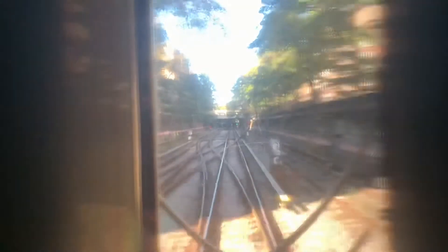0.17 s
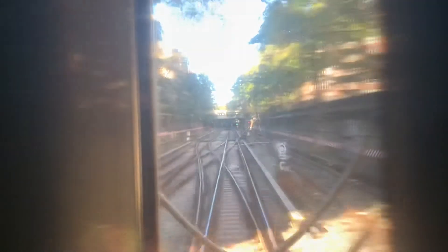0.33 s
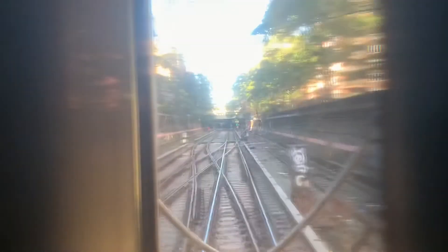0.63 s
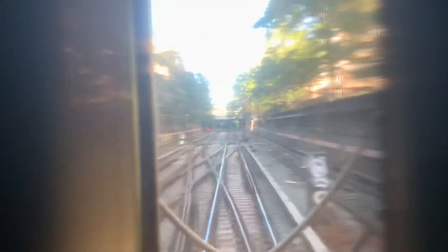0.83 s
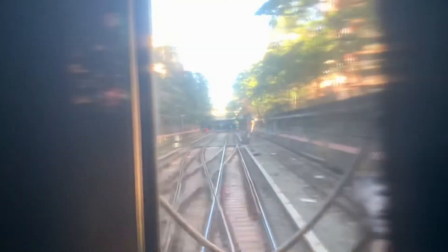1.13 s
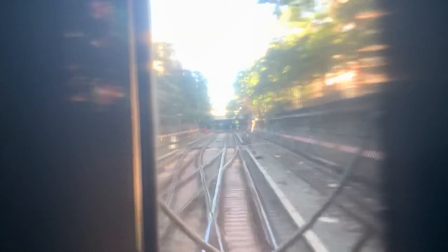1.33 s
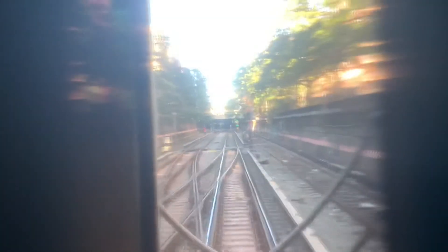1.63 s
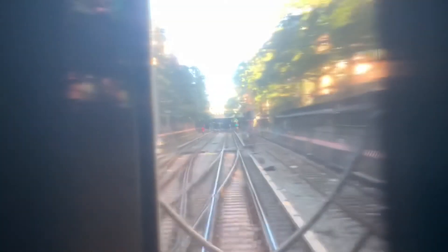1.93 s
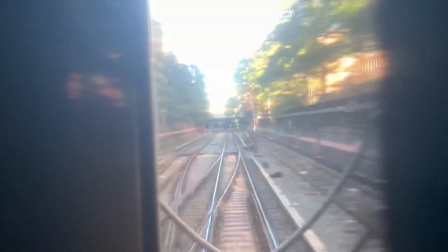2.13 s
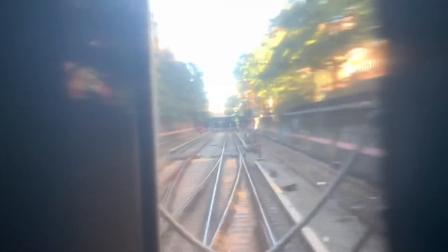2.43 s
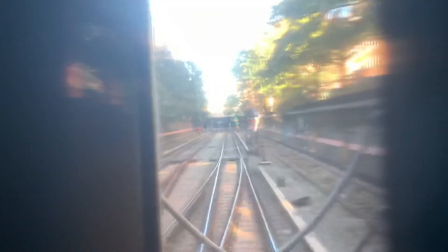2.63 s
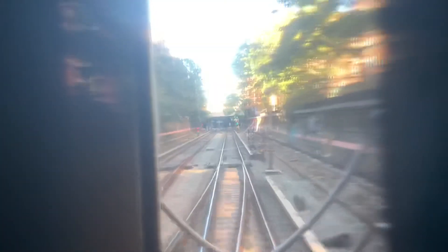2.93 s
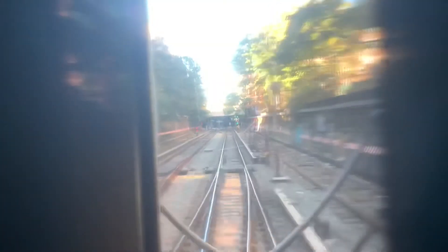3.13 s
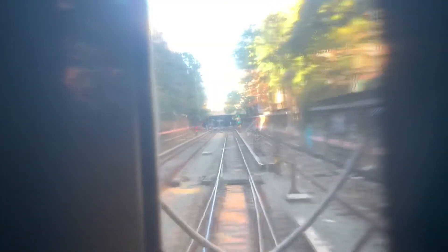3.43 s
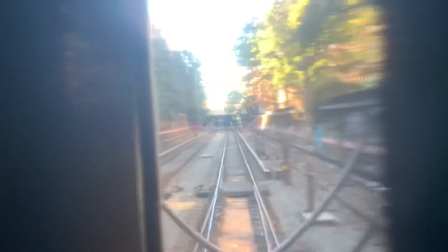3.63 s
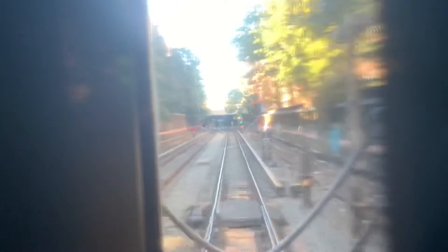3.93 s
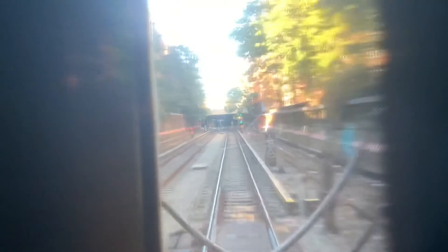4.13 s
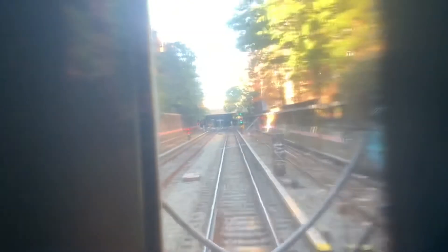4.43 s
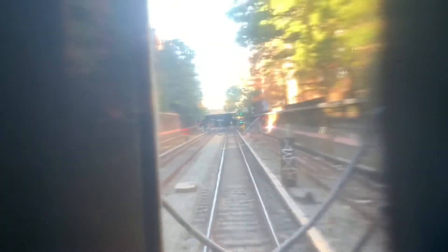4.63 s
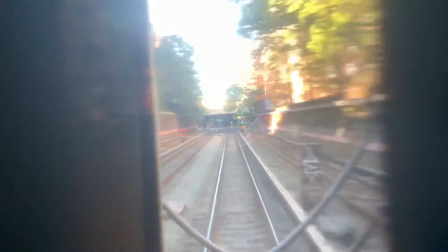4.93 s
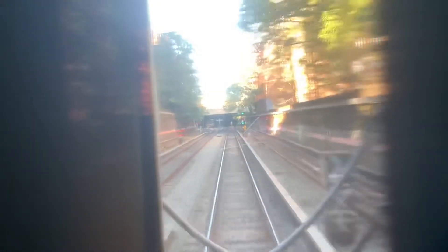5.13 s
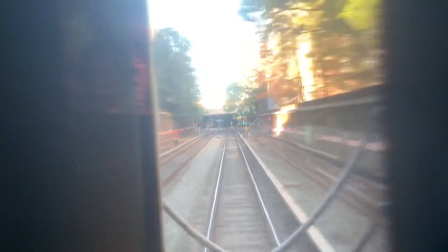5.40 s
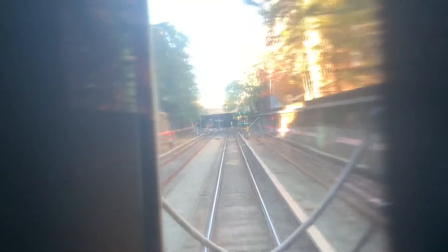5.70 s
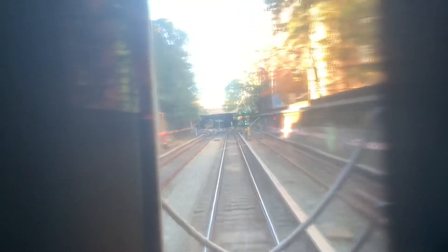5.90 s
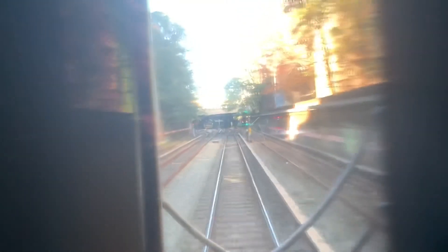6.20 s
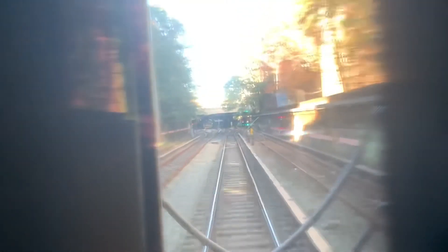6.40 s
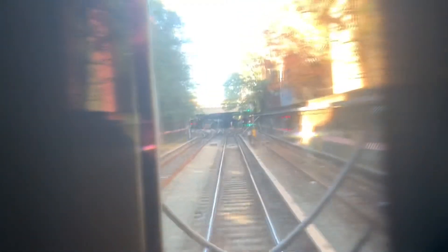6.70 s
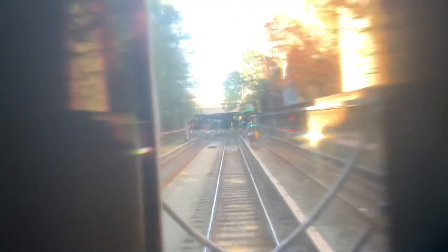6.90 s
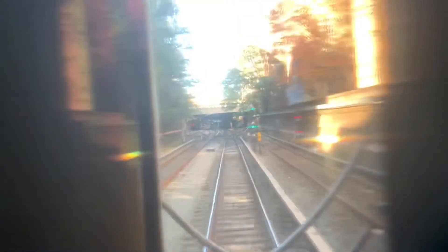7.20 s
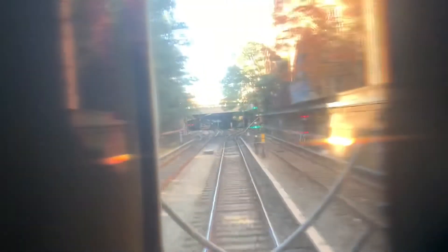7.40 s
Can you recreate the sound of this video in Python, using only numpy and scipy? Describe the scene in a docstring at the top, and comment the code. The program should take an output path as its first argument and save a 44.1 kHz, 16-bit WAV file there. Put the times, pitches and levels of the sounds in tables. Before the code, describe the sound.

From inside the cab of a moving metro train, the wheels make a continuous low rumble and the car body booms over bumps. In the first seconds the wheels clank sharply across rail gaps, with short gritty scrapes between. A heavier drumming follows through the switches, with a couple of small close ticks. Later the rumble evens out, with a soft thud and faint squeaks. A thin electric whine wavers throughout.

```python
"""Metro front cab at speed, through an open cutting and over switches.

Rough wheels and rails shake the car body; its panels and air space boom. The power converter
whines throughout. Wheels clank over rail gaps, a loose fitting ticks close by, flanges rub
and squeak, and the switchwork drums under the bogie."""
import sys
import numpy as np
from scipy import signal
from scipy.fft import rfft, irfft, next_fast_len
from scipy.io import wavfile
from scipy.ndimage import uniform_filter1d, minimum_filter1d

SR = 44100
rng = np.random.default_rng(int(sys.argv[2]) if len(sys.argv) > 2 else 0)


def put_to_file(sound):
    """Save the sound as 16-bit audio at rate SR, in the file named by the first command-line argument."""
    columns = np.atleast_2d(sound).T  # one column per channel
    safe = np.clip(columns, -1, 1)
    whole_steps = np.round(safe * 32767)
    wavfile.write(sys.argv[1], SR, whole_steps.astype(np.int16))


N = 332955
TIME_S = np.arange(N) / SR
FFT_SIZE = next_fast_len(N, real=True)
FREQ_HZ = np.maximum(np.arange(FFT_SIZE // 2 + 1) * SR / FFT_SIZE, 1)

# Rolling noise through the car body. Each row: frequency in Hz, relative density in dB.
BODY_SPECTRUM = [(20, -39.5), (31, -18.5), (43, -1), (75, 3.5), (130, 0), (310, -4), (480, -13), (720, -21),
                 (1400, -29.5), (2050, -29.5), (3000, -46), (6500, -62), (9000, -86), (15000, -95.5)]
# Its stereo width. Each row: frequency in Hz, side minus mid in dB.
BODY_SPREAD = [(40, -8.5), (120, -11.5), (200, -7.5), (330, -3.5), (500, 0), (740, 2.5), (1000, 1),
               (2000, -0.16)]
# Cab and wheel resonances. Each row: frequency in Hz, width in Hz, mid lift in dB, side lift in dB.
CAB_MODES = [(84.1, 6, 6, -5), (116, 57, -0.5, -3.5), (182.1, 41, 7.5, -2), (295.4, 37, 4, -4),
             (356.8, 30, 5.5, -2), (410, 52, 1.5, 2), (482, 36, 3.5, 1.5), (591, 44, 2.5, 2.5),
             (934, 130, 3, 0), (1420, 120, 1, 6.5), (1903, 190, 5, 2.5)]
# Track roughness, worst at the switches. Each row: time in seconds, relative level in dB.
TRACK_ROUGHNESS = [(0, -14.5), (0.25, -19.5), (0.5, -15.5), (0.85, -18), (1.72, -15.5), (1.95, -17),
                   (2.15, -12.5), (2.8, -16.5), (4.7, -16.5), (5.5, -17.5), (6.5, -16.5), (7.55, -17)]
# Slow body sway. Each row: time in seconds, level in dB.
SWAY_LEVEL = [(0, -25.5), (1.3, -28.5), (2.3, -27), (4.35, -33), (5.7, -26), (7.55, -28.5)]
# Bands above the sway: bogie boom, floor drone, wall panels, rail roar, wheel ring, tread hiss.
# Each row: level on average track in dB, dB per dB of roughness, flutter in dB, left minus right in dB.
ROLLING_BANDS = [(-22.5, 0.2, 0.5, 2), (-19.5, 0.26, 0, 0.5), (-18, 1.0, 0.5, 2.5), (-27, 0.93, 1.0, 1.15),
                 (-36, 0.8, 1.0, 1), (-50, 1, 1.5, 1.3)]
# Track dips and humps. Each row: start and length in seconds, bogie, floor and wall levels in dB.
JOLTS = [(0.045, 0.047, -19, -24, -16), (0.17, 0.24, -16.5, -29, -35), (0.598, 0.091, -15.5, -36, -15.5),
         (1.668, 0.25, -19.5, -36, -20.5), (2.087, 0.15, -17, -13, -28), (2.254, 0.15, -16.5, -15.5, -25),
         (2.713, 0.11, -32, -15, -25), (2.902, 0.19, -18, -12.5, -15.5), (3.121, 0.25, -19.5, -21.5, -21.5),
         (3.415, 0.12, -26, -18.5, -16), (3.638, 0.14, -20.5, -23, -18.5), (4.122, 0.069, -33, -12.5, -32),
         (4.278, 0.18, -18, -20, -38), (4.643, 0.074, -17.5, -25, -26), (6.02, 0.088, -19, -26, -22.5),
         (6.63, 0.058, -32, -14.5, -22.5), (6.99, .07, -18, -34, -41)]
# Converter switching tone. Each row: time in seconds, relative level in dB.
WHINE_LEVEL = [(0.0, -61), (0.3, -50), (0.5, -64), (0.65, -54), (1.35, -61), (1.75, -51.5), (2.76, -52.5),
               (2.85, -75), (2.95, -51.5), (3.1, -60), (4.3, -53.5), (4.6, -64), (4.75, -60), (5.25, -52.5),
               (5.75, -57.5), (6.0, -70), (6.7, -62), (7.54, -60)]
# Its standing waves at the ears. Each row: time in seconds, left phase lead in radians.
WHINE_PHASE = [(0.75, -1), (1.2, 1), (2.8, 0.78), (2.9, -1.1), (6.1, -1.1), (6.6, 0.1)]
# Its sideband balance. Each row: time in seconds, lower minus upper in dB.
SIDEBAND_BALANCE = [(2.3, 10), (3.2, -7.5), (6.2, -3), (6.8, 9)]
# A thin high tone and a narrow hiss. Each row: frequency in Hz, width in Hz, level in dB.
FAINT_HIGHS = [(8540, 12, -89.5), (11000, 610, -80.5)]
# Wheels striking rail gaps. Each row: start in seconds, clank level in dB, rise and contact times
# in seconds, thud level in dB.
RAIL_JOINTS = [(0.272, -33.5, 0.011, .011, -38), (0.648, -18.5, .002, 0.0033, -10),
               (0.653, -15.5, 0.0024, 0.0053, -11), (0.669, -24, .002, 0.0026, -10),
               (1.383, -26, .004, .006, -25), (1.392, -22, .005, 0.019, -20),
               (2.207, -22.5, .005, 0.0058, -31), (2.227, -18, 0.011, 0.0049, -18),
               (2.555, -34, 0.031, 0.021, -35), (4.180, -40, 0.0095, .011, -21),
               (6.449, -43.5, 0.0037, 0.0088, -17.5), (7.199, -33.5, .002, 0.006, -34)]
# Steel clank. Each row: frequency in Hz, relative density in dB.
CLANK_SPECTRUM = [(400, -3), (900, 5.5), (1400, 3), (2100, 5), (2900, -6), (4500, -8), (6800, -15.5),
                  (8200, -27.5), (10000, -44), (15000, -54)]
# Wheel resonances. Each row: frequency in Hz, width in Hz, lift in dB.
WHEEL_MODES = [(1624, 76, 3.5), (1856, 170, 6.5), (2090, 99, 4), (2310, 130, 7), (3380, 100, 6.5),
               (3530, 110, 5), (3930, 87, 4.5), (4580, 220, 3.5)]
# Taps of the loose fitting. Each row: start in seconds, gain in dB, tilt in dB per octave,
# left minus right in dB, left ear lag in milliseconds.
TICKS = [(0.671, -34, 4, -2, 0.22), (2.3195, -27, 1, -2, 0.2), (3.0864, -23, 3, -1, 0.294),
         (7.113, -36, -2, 0, -0.083)]
# Resonances of the fitting. Each row: frequency in Hz, relative level in dB, T60 in seconds.
FITTING_MODES = [(2520, 12.5, 0.0051), (3430, 10, 0.0042), (4630, 2, 0.0066), (6400, 3.5, 0.0073),
                 (9600, -5, 0.0035), (11300, -2, 0.0055)]
# Flanges on the rail head. Each row: middle and length in seconds, centre and width in Hz, level in dB.
FLANGE_RUBS = [(0.99, 0.025, 2240, 1000, -32), (1.068, 0.057, 1810, 230, -28.5),
               (1.065, 0.071, 2380, 380, -35.5), (1.195, 0.12, 2140, 520, -34),
               (1.11, 0.25, 3600, 2300, -47.5), (1.68, 0.23, 2300, 2200, -41.5),
               (1.715, 0.061, 1400, 600, -32), (2.35, 0.11, 1150, 1800, -27.5),
               (3.024, 0.25, 1870, 1300, -28.5), (3.01, 0.21, 3550, 1500, -41.5),
               (5.085, 0.032, 1050, 370, -28), (6.075, 0.13, 4750, 1100, -54),
               (6.11, 0.16, 840, 440, -29.5), (6.44, 0.18, 630, 740, -27)]
# Notes of a slipping wheel. Each row: middle and length in seconds, pitch in Hz, level in dB.
SQUEAKS = [(1.138, .055, 4360, -53), (1.125, .03, 3110, -50), (6.41, .03, 4188, -50),
           (6.412, .04, 3930, -53), (6.59, .085, 4350, -48.5), (6.6, .09, 4100, -59)]
# Drone over the switches. Each row: time in seconds, level in dB.
SWITCH_LEVEL = [(2.03, -36), (2.12, -19), (2.25, -13), (2.6, -24), (2.9, -25), (3.25, -19.5), (4.25, -22.5),
                (4.8, -42)]


def undb(db):
    """Decibels to gain."""
    return np.exp(np.asarray(db) * (np.log(10) / 20))


def curve(points):
    """Breakpoints joined linearly in time."""
    return np.interp(TIME_S, *np.transpose(points))


def spectrum_db(points):
    """Breakpoints joined on a log frequency axis."""
    hz, db = np.transpose(points)
    return np.interp(np.log(FREQ_HZ), np.log(hz), db)


def bell(hz, width_hz):
    """Gaussian peak of height 1; width at half height."""
    near = np.abs(FREQ_HZ - hz) < 3 * width_hz
    return near * np.exp2(-(2 * (FREQ_HZ - hz) / width_hz) ** 2)


def lowpass(hz, order=2):
    """Butterworth gain per frequency."""
    return 1 / np.sqrt(1 + (FREQ_HZ / hz) ** (2 * order))


def minimum_phase(db):
    """Response with this spectrum that rings only after a strike."""
    cepstrum = irfft(np.log(undb(db)), FFT_SIZE)
    fold = np.where(np.arange(FFT_SIZE) < FFT_SIZE // 2, 2, 0)
    return np.exp(rfft(cepstrum * fold) - cepstrum[..., :1])


def filtered(x, gain):
    """Apply a gain per frequency."""
    return irfft(rfft(x, FFT_SIZE) * gain, FFT_SIZE)[..., :N]


def unit_rms(x):
    """Scale to rms 1."""
    return x / np.sqrt(np.mean(x ** 2))


def steady(x, span_s):
    """Hold the running rms across channels at 1."""
    size = int(span_s * SR / 2) + 1
    power = np.mean(x ** 2, axis=0)
    return x / np.sqrt(uniform_filter1d(uniform_filter1d(power, size), size))


def noise_pair(gain):
    """Two independent filtered noises, joint rms 1."""
    return unit_rms(filtered(rng.standard_normal((2, N)), gain))


def flutter(cutoff_hz):
    """Low-passed random waver, rms 1."""
    return unit_rms(filtered(rng.standard_normal(N), lowpass(cutoff_hz)))


def impacts(median_hz, t60_s, scatter_db=1.0):
    """Envelope of a run of small, uneven impacts, rms 1."""
    gap, size = rng.standard_normal((2 * median_hz * N // SR, 2)).T
    starts_s = np.cumsum(np.exp(gap / 2)) / median_hz - 1
    last = np.searchsorted(starts_s, TIME_S) - 1
    jagged = undb(scatter_db * size[last] - 60 * (TIME_S - starts_s[last]) / t60_s)
    return unit_rms(filtered(jagged, lowpass(4 * median_hz) ** 2))


def panel_ripple_db(spacing_hz=29.99, depth_db=6.0):
    """Crowded small panel modes above the boom: a static spectral ripple per ear."""
    grid_hz = np.arange(0, SR / 2, spacing_hz)
    heights = rng.standard_normal((len(grid_hz), 2)).T
    ripple = np.array([np.interp(FREQ_HZ, grid_hz, ear) for ear in heights])
    return depth_db * (1 - lowpass(650)) * ripple


def cab_bands(ripple_db, crossovers_hz=(58, 115, 235, 520, 1600, 2800)):
    """Noise through the cab's resonances, in seven levelled and panned bands, sway first."""
    body_db = spectrum_db(BODY_SPECTRUM)
    mid_db = body_db + sum(lift * bell(hz, width) for hz, width, lift, _ in CAB_MODES)
    side_db = body_db + sum(lift * bell(hz, width) for hz, width, _, lift in CAB_MODES)
    mid, side = noise_pair(undb([mid_db, side_db + spectrum_db(BODY_SPREAD)]))
    cab = filtered(np.array([mid + side, mid - side]), undb(0.68 * ripple_db))
    edges = [0] + [lowpass(hz, order=8) ** 2 for hz in crossovers_hz] + [1]
    pans_db = [0] + [row[-1] for row in ROLLING_BANDS]
    return [steady(filtered(cab, high - low), span_s=0.49) * undb([[pan_db / 2], [-pan_db / 2]])
            for low, high, pan_db in zip(edges, edges[1:], pans_db)]


def rolling(ripple_db, fade_db_per_s=0.32, rail_jolt_db=-11.5):
    """Wheel and rail roughness shakes the cab; rougher track drives it harder, jolts add boom."""
    bands = cab_bands(ripple_db)
    rough_db = curve(TRACK_ROUGHNESS)
    rough_db -= rough_db.mean()
    grit = flutter(9.5)
    bogie, floor, walls, rail, wheel, hiss = (
        undb(db + slope * rough_db + grit_db * grit) for db, slope, grit_db, _ in ROLLING_BANDS)
    bogie_jolt, floor_jolt, wall_jolt = jolts()
    fade = undb(-fade_db_per_s * (TIME_S - TIME_S.mean()))  # less ring toward plain track
    gains = (undb(curve(SWAY_LEVEL)),
             np.hypot(bogie, bogie_jolt), np.hypot(floor, floor_jolt), np.hypot(walls, wall_jolt),
             np.hypot(rail * fade, wall_jolt * undb(rail_jolt_db)),
             wheel * fade, hiss * fade)
    return sum(band * gain for band, gain in zip(bands, gains))


def jolts(attack_s=0.03, t60_s=0.43):
    """Track dips set the car booming: bogie, floor and wall gains swell, hold and decay."""
    power = np.zeros((3, N))
    for start_s, length_s, *levels_db in JOLTS:
        attack = np.clip((TIME_S - start_s) / attack_s, 0, 1)
        release = undb(-60 * np.maximum(TIME_S - start_s - length_s, 0) / t60_s)
        power += np.outer(undb(levels_db), attack * release) ** 2
    return np.sqrt(power)


def converter_whine(carrier_hz=5859.2, offset_hz=146.1, sideband_db=-71.5, waver_db=1.64):
    """The switching tone swells and fades as the listener sways in its standing waves."""
    lag_rad = np.outer([0, 1], curve(WHINE_PHASE))
    lean_db = curve(SIDEBAND_BALANCE) / 2
    lines = ((carrier_hz, curve(WHINE_LEVEL) + 1),
             (carrier_hz - offset_hz, sideband_db + lean_db),
             (carrier_hz + 0.95 * offset_hz, sideband_db - lean_db))
    tones = sum(undb(db) * np.sin(2 * np.pi * hz * TIME_S - lag_rad) for hz, db in lines)
    return np.sqrt(2) * tones * undb(waver_db * flutter(4.5))


def faint_highs():
    """A very faint thin tone near 8.5 kHz and a narrow hiss near 11 kHz."""
    gain = sum(undb(db) * unit_rms(bell(hz, width_hz)) for hz, width_hz, db in FAINT_HIGHS)
    return filtered(rng.standard_normal(N), gain)


def wheel_lift_db():
    """Peaks that a wheel's modes put on any excitation."""
    return sum(lift_db * bell(hz, width_hz) for hz, width_hz, lift_db in WHEEL_MODES)


def rail_joints(ripple_db, clank_t60_s=0.06, tail_t60_s=0.5, thud_t60_s=0.19, tail_db=-14.5):
    """A wheel chatters across each gap: it clanks, the cab rattles on more dully, the floor thuds."""
    clank, tail, thud = np.zeros((3, N))
    for start_s, db, rise_s, contact_s, thud_db in RAIL_JOINTS:
        span = slice(int(start_s * SR), int(start_s * SR) + SR)
        attack = np.clip((TIME_S[span] - start_s) / rise_s, 0, 1)
        age_s = np.maximum(TIME_S[span] - start_s - rise_s - contact_s, 0)
        clank[span] = np.hypot(clank[span], attack * undb(db - 60 * age_s / clank_t60_s))
        tail[span] = np.hypot(tail[span], attack * undb(db + tail_db - 60 * age_s / tail_t60_s))
        thud[span] = np.hypot(thud[span], attack * undb(thud_db - 60 * age_s / thud_t60_s))
    strikes = impacts(median_hz=160, t60_s=0.035)
    chatter = steady(strikes * rng.standard_normal((2, N)), span_s=0.015)
    rattle = steady(undb(2 * flutter(110))[None], span_s=0.04)
    steel = minimum_phase(spectrum_db(CLANK_SPECTRUM) + ripple_db + wheel_lift_db())
    steel /= np.sqrt(np.mean(np.abs(steel) ** 2))
    floor = steady(filtered(rng.standard_normal((1, N)), bell(290, 320)), span_s=0.043)
    dull_steel = noise_pair(steel * lowpass(8000))
    return filtered(clank * chatter, steel) + tail * rattle * dull_steel + thud * floor


def wheel_rings(ring_db=-6.5, t60_s=0.21, scatter_db=4.5, tilt_db_per_oct=-3.0, detune=0.0065):
    """The wheel rings on after each gap; every blow loads its modes differently."""
    out = np.zeros((2, N))
    hz, _, lift_db = np.array(WHEEL_MODES).T
    steel_db = np.interp(hz, FREQ_HZ, spectrum_db(CLANK_SPECTRUM))
    mode_db = lift_db + steel_db + tilt_db_per_oct * np.log2(hz / hz.mean())
    for start_s, db, rise_s, _, _ in RAIL_JOINTS:
        span = slice(int(start_s * SR), int(start_s * SR) + SR // 3)
        age_s = TIME_S[span] - start_s
        attack = np.clip(age_s / rise_s, 0, 1)
        decay = undb(db + ring_db - 60 * np.maximum(age_s - rise_s, 0) / t60_s)
        pitch_hz = hz * (1 + detune * rng.standard_normal(len(hz)))
        for ear in range(2):
            gains = undb(mode_db + scatter_db * rng.standard_normal(len(hz)))
            modes = np.sin(2 * np.pi * (np.outer(pitch_hz, age_s) + rng.random((len(hz), 1))))
            out[ear, span] += attack * decay * unit_rms(gains @ modes)
    return out


def fitting_ticks(detune=0.059):
    """A small loose part taps close by and rings for a few milliseconds."""
    out = np.zeros((2, N))
    hz, mode_db, t60_s = np.array(FITTING_MODES).T[:, :, None]
    for start_s, db, tilt_db_per_oct, pan_db, lag_ms in TICKS:
        span = int(start_s * SR) + np.arange(-SR // 500, SR // 50)
        tilted_db = mode_db + tilt_db_per_oct * np.log2(hz / hz.mean())
        for ear, sign in enumerate((1, -1)):
            age_s = np.maximum(TIME_S[span] - start_s - sign * lag_ms / 2000, 0)
            pitch_hz = hz * (1 + detune * rng.standard_normal(hz.shape))
            modes = undb(tilted_db - 60 * age_s / t60_s) * np.sin(2 * np.pi * pitch_hz * age_s)
            out[ear, span] += undb(db + sign * pan_db / 2) * modes.sum(axis=0)
    return out


def flange_rubs(ripple_db, size=2 ** 15):
    """A flange sticks and slips in gritty bursts, exciting the wheel's modes."""
    out = np.zeros((2, N))
    slips = steady(impacts(median_hz=85, t60_s=0.11)[None], span_s=0.08)
    wheel = undb(0.56 * wheel_lift_db() + 0.8 * ripple_db[0])
    for middle_s, length_s, hz, width_hz, db in FLANGE_RUBS:
        span = np.clip(int(middle_s * SR) - size // 2 + np.arange(size), 0, N - 1)
        swell = np.exp2(-(2 * (TIME_S[span] - middle_s) / length_s) ** 4)
        gain = np.interp(np.fft.rfftfreq(size, 1 / SR), FREQ_HZ, bell(hz, width_hz) * wheel)
        scrape = irfft(rfft(rng.standard_normal((2, size))) * gain)
        out[:, span] += undb(db) * swell * steady(scrape, span_s=0.03)
    return out * slips


def wheel_squeaks(waver_hz=12.0, right_lag_rad=0.8, rough_db=1.5):
    """A slipping wheel locks onto a rough, wavering note that swells and dies."""
    out = np.zeros((2, N))
    drift_cycles = np.cumsum(waver_hz * flutter(40)) / SR
    lag_rad = np.array([[0], [right_lag_rad]])
    grip = undb(rough_db * flutter(85))
    for middle_s, length_s, hz, db in SQUEAKS:
        span = np.abs(TIME_S - middle_s) < 2 * length_s
        swell = grip[span] * np.exp2(-(2 * (TIME_S[span] - middle_s) / length_s) ** 2)
        tone = np.sin(2 * np.pi * (hz * TIME_S[span] + drift_cycles[span]) - lag_rad)
        out[:, span] += np.sqrt(2) * undb(db) * swell * tone
    return out


def switch_drone(hz=119, width_hz=44):
    """The switchwork drums under the bogie, below the floor's own note."""
    drum = filtered(rng.standard_normal((1, N)), bell(hz, width_hz))
    return undb(curve(SWITCH_LEVEL)) * steady(drum, span_s=0.23)


def scene():
    """Stereo sum of all sources in the cab."""
    ripple_db = panel_ripple_db()
    wheels = rail_joints(ripple_db) + wheel_rings() + flange_rubs(ripple_db) + wheel_squeaks()
    rumble = rolling(ripple_db) + switch_drone()
    return rumble + wheels + fitting_ticks() + converter_whine() + faint_highs()


def record(dry, ceiling=0.93, cutoff_hz=15800):
    """Smooth peak limiter, then a steep low-pass."""
    size = SR // 100
    needed = ceiling / np.maximum(np.abs(dry).max(axis=0), ceiling)
    held = minimum_filter1d(needed, 2 * size)
    gain = uniform_filter1d(uniform_filter1d(held, size), size)
    top_cut = signal.ellip(8, 0.2, 70, cutoff_hz, fs=SR, output="sos")
    return signal.sosfilt(top_cut, dry * gain)


dry = scene()
out = record(dry)
put_to_file(out)
```